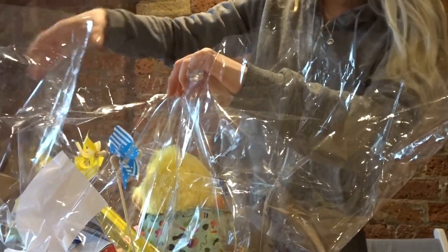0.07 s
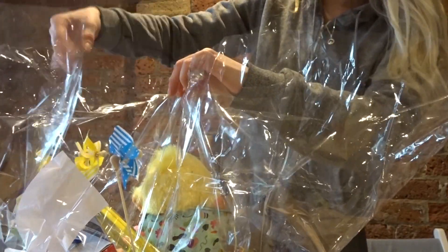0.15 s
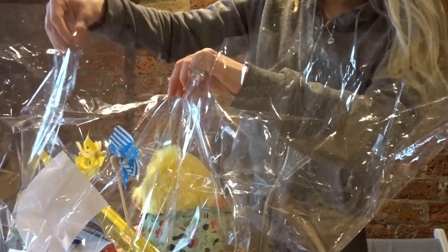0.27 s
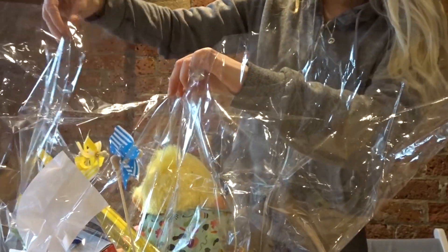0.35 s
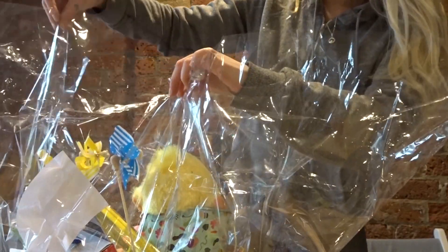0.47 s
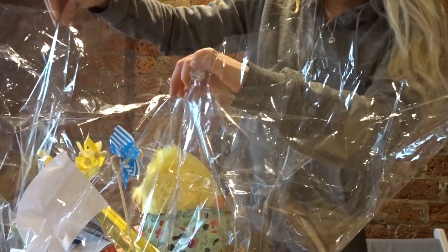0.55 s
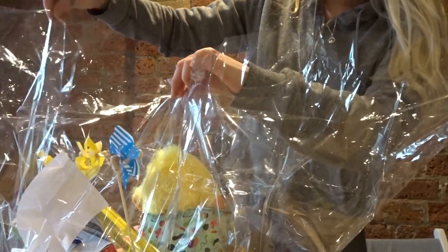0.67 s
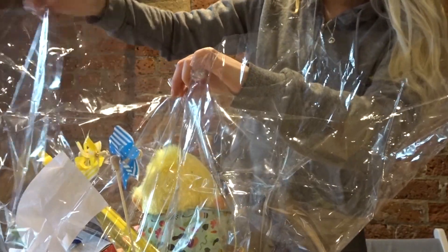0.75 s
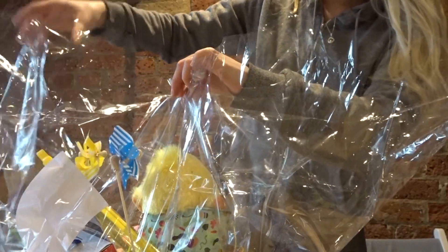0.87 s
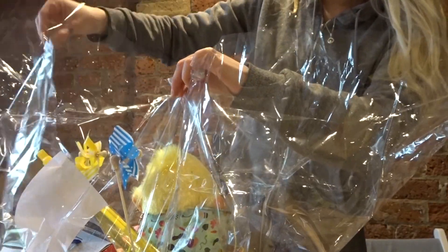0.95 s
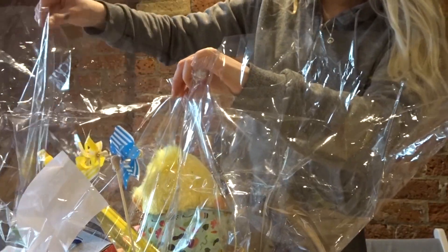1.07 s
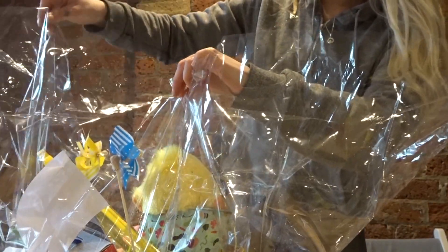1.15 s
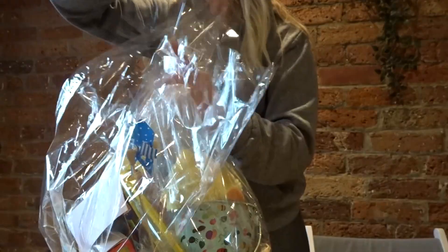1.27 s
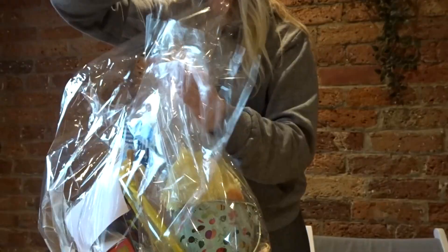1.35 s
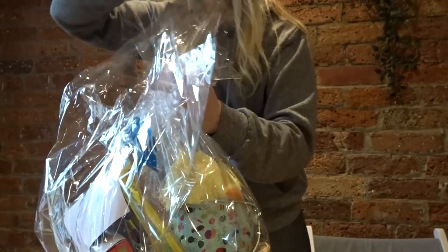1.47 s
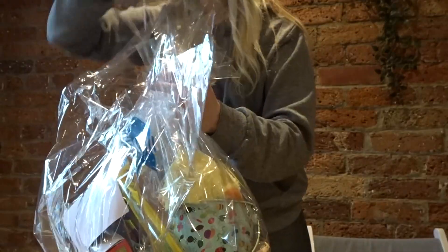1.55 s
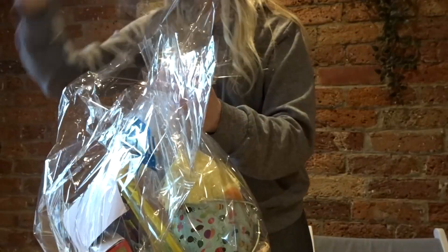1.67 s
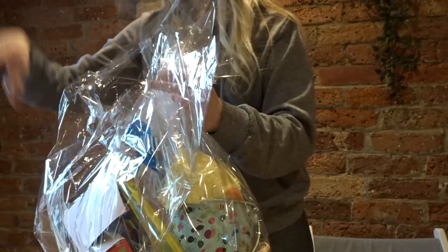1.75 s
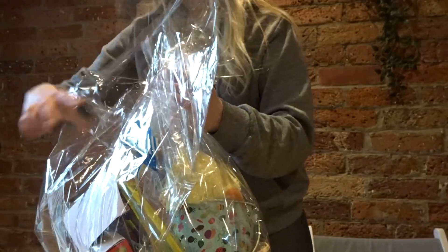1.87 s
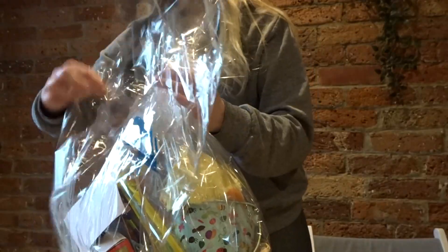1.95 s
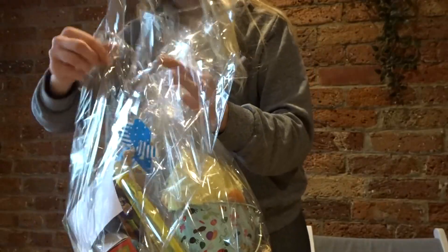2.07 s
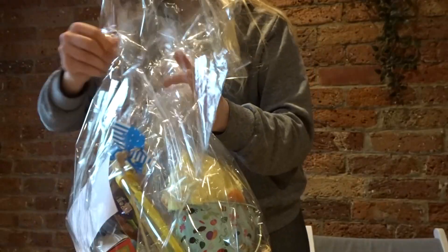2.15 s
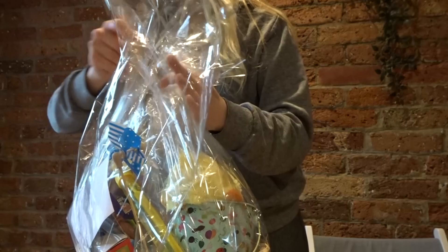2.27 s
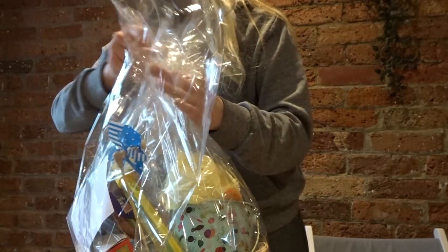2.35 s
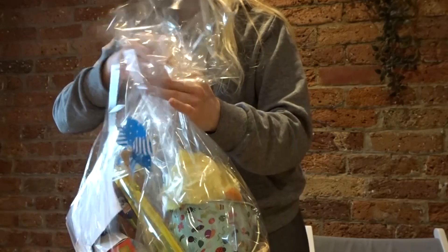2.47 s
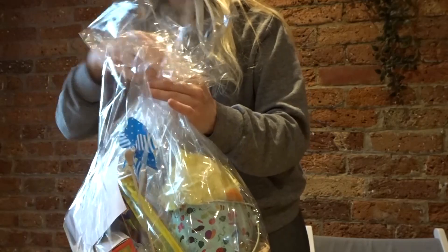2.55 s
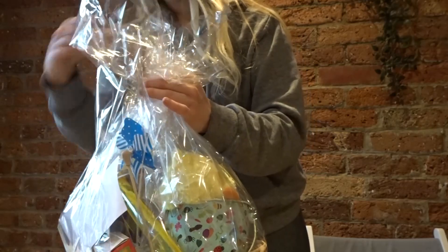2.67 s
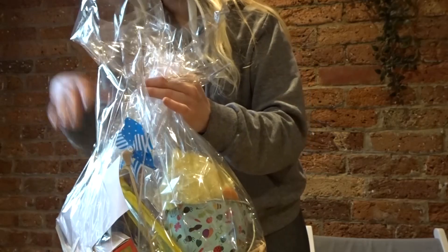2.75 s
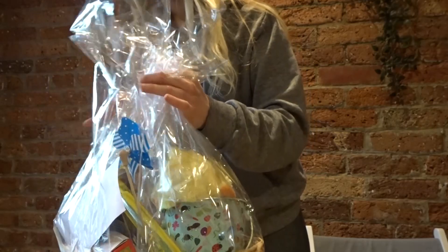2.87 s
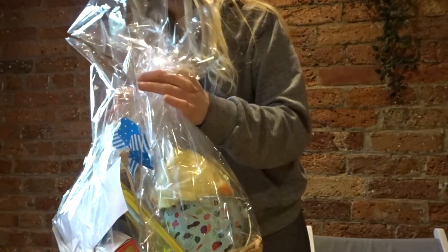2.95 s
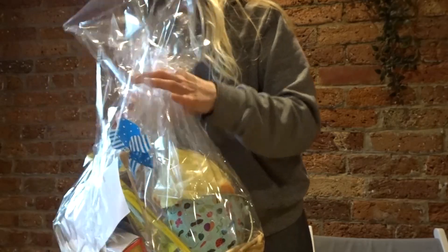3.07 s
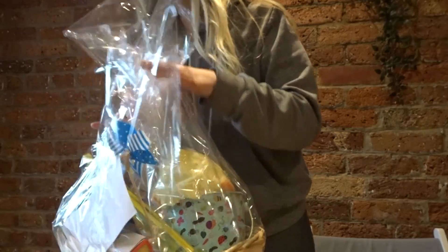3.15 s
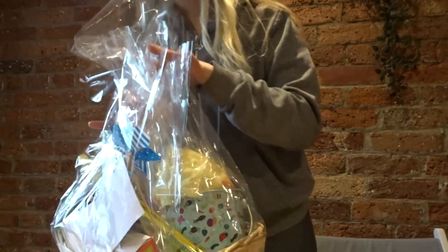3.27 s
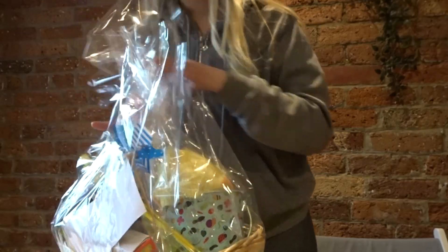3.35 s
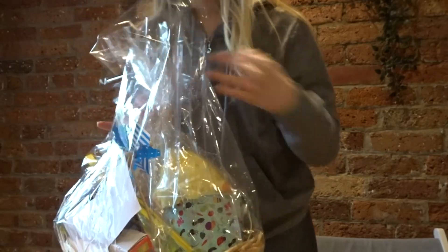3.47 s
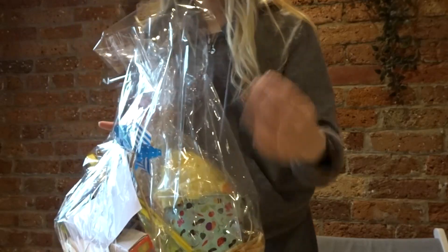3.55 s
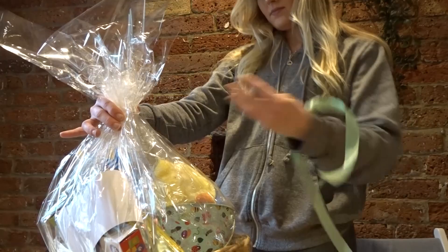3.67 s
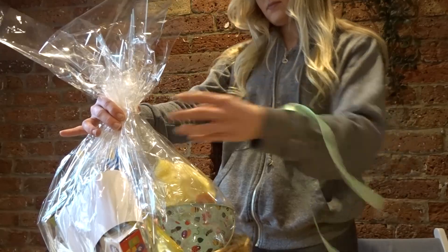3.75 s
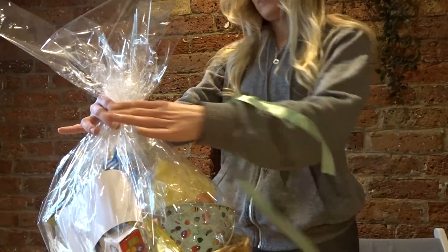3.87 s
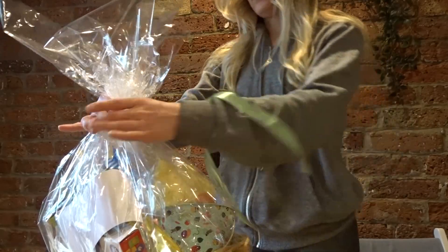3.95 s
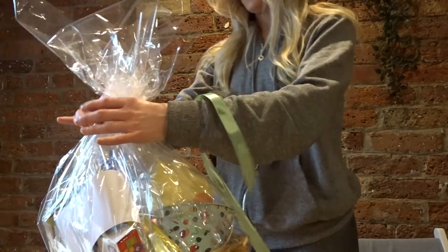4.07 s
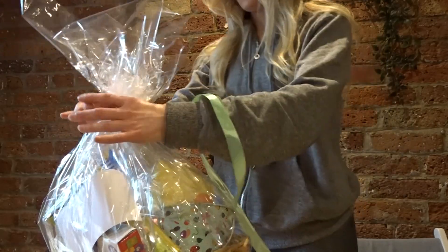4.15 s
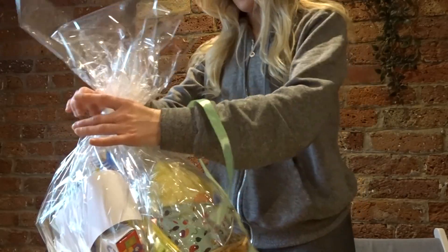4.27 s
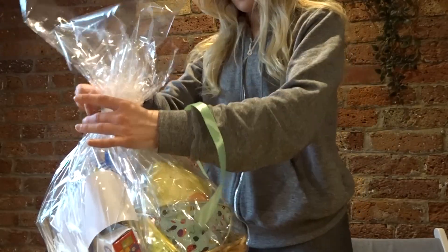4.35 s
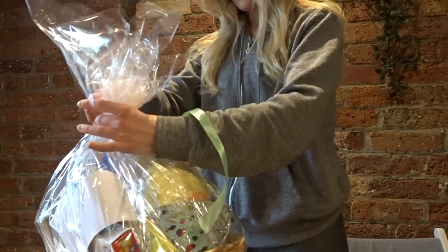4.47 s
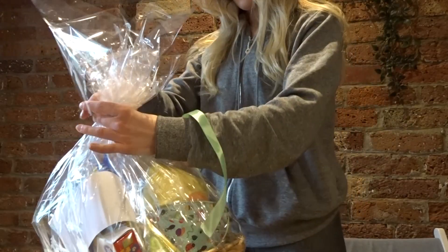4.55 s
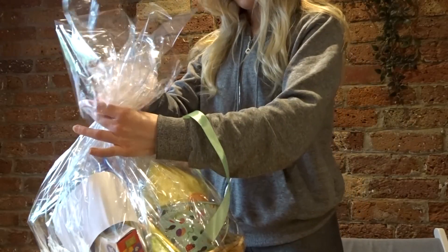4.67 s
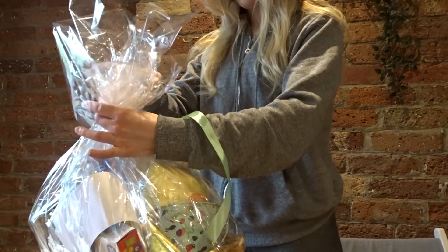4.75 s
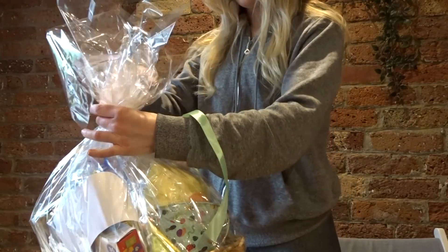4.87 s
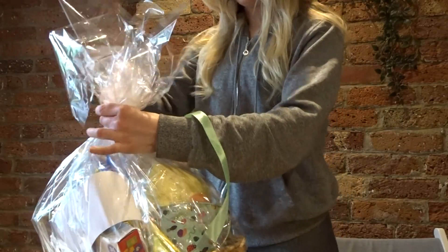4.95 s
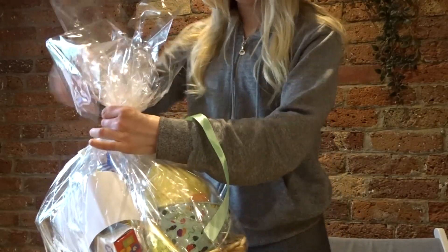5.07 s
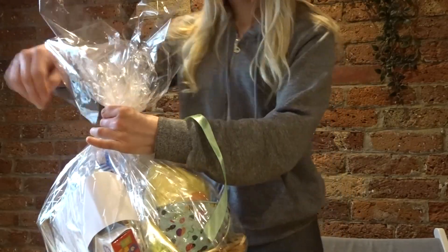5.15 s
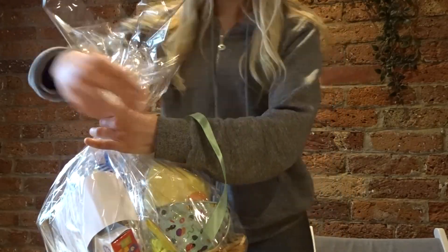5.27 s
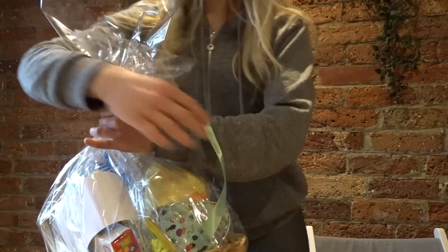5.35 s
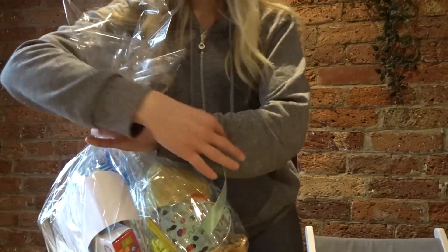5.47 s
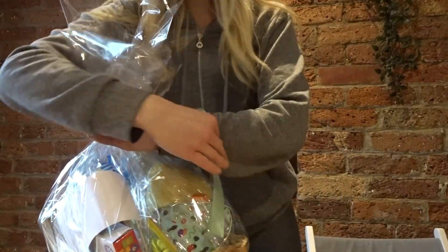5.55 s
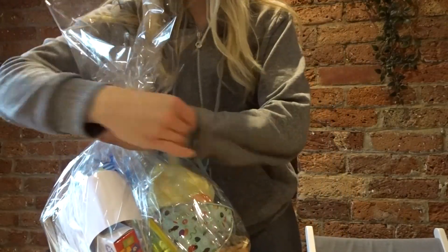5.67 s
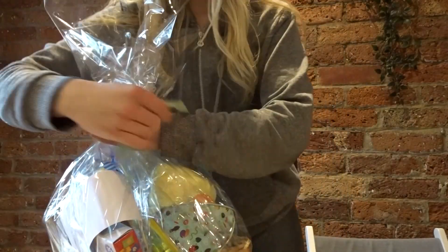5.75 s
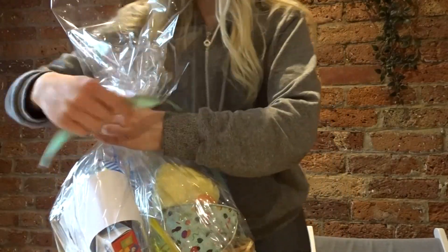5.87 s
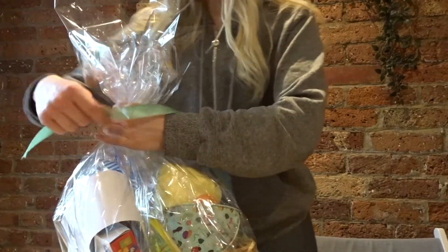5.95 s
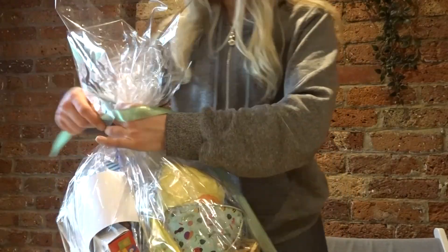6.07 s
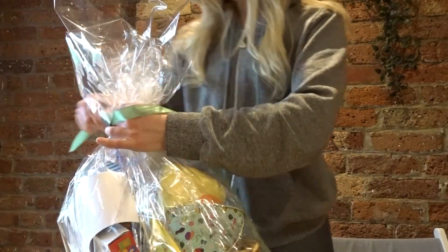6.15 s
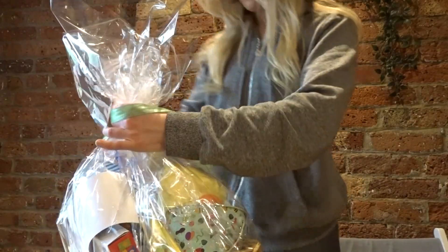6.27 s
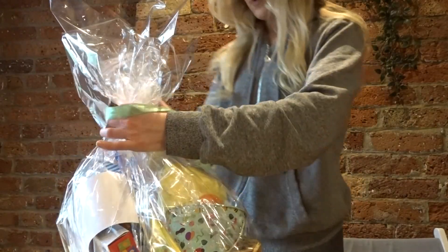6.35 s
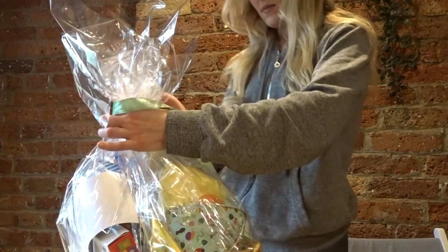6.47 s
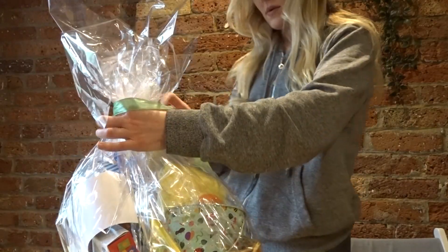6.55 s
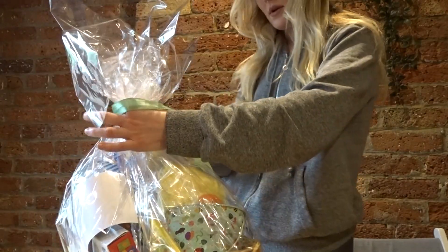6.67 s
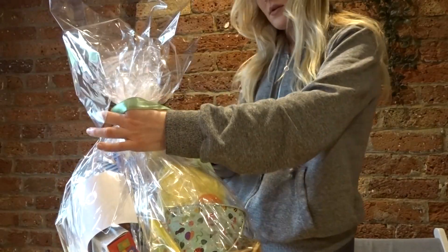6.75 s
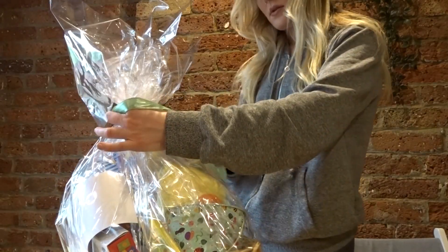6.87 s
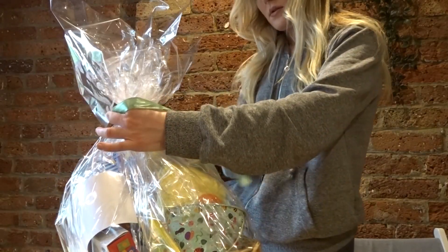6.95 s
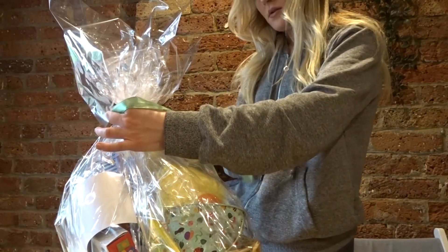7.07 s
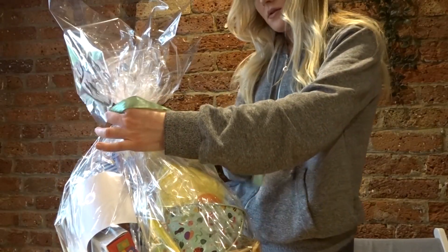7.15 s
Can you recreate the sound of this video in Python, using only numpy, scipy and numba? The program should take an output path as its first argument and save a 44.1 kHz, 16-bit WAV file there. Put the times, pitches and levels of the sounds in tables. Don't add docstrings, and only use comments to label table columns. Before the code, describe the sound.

Stiff clear plastic film crackles in rough tugs, then bunches into loud dense crinkling before easing into sparse, gentle crackles in a brick room.

```python
import sys
import numpy as np
from scipy import signal
from scipy.fft import rfft, irfft, next_fast_len
from scipy.io import wavfile
from scipy.ndimage import map_coordinates
from numba import njit

SR = 44100
rng = np.random.default_rng(int(sys.argv[2]) if len(sys.argv) > 2 else 0)


def dump(signal):
    limited = np.clip(np.atleast_2d(signal).T, -1, 1)
    pcm = np.round(limited * 32767).astype(np.int16)
    wavfile.write(sys.argv[1], SR, pcm)


def how_loud(loudness_db):
    steps = np.asarray(loudness_db, float) / 20
    return 10 ** steps


N = 317927

SPLICES = [1.243, 3.646]
# [start t/s, end t/s, first level/dB, last level/dB]
GRIPS = [(.17, .47, -23, -26), (.91, 1.01, -22.5, -23.5), (1.245, 1.35, -22.5, -17.5),
         (1.36, 1.49, -17, -17), (1.52, 1.585, -22.5, -20.5), (1.73, 1.84, -33.5, -33.5),
         (1.925, 2.03, -22, -15.5), (2.03, 2.3, -14.5, -19), (2.3, 2.52, -18, -14),
         (2.52, 2.73, -14, -17.5), (2.78, 2.88, -26.5, -27), (2.88, 3.03, -24, -14.5),
         (3.03, 3.3, -15, -14), (3.3, 3.45, -13, -19.5), (3.77, 3.85, -46, -40), (3.875, 3.95, -30, -36),
         (3.975, 4.07, -23.5, -19), (4.11, 4.3, -22, -20), (4.3, 4.44, -21.5, -21.5),
         (4.44, 4.66, -20.5, -16.5), (4.66, 4.92, -16.5, -23), (4.92, 5.11, -23, -18.5),
         (5.18, 5.26, -26, -27), (5.275, 5.47, -17, -24), (5.57, 5.8, -27.5, -32), (5.8, 6.0, -31.5, -40.5),
         (6.04, 6.17, -36, -38), (6.21, 6.41, -38.5, -26.5), (6.495, 6.69, -30, -37),
         (7.04, 7.13, -40.5, -33)]
# [t/s, peak level/dB, f/Hz]
FOLD_CRACKS = [(0.0588, -19, 3660), (0.0862, -16, 5060), (0.1745, -10, 4250), (0.2254, -7, 4720),
               (0.2764, -10, 4050), (0.3094, -7, 4090), (0.3381, -6, 4310), (0.3864, -7, 4610),
               (0.4155, -9, 4580), (0.4454, -11, 4610), (0.5097, -7, 3960), (0.5154, -7, 4850),
               (0.5944, -21, 4320), (0.6659, -9, 4090), (0.6814, -16, 4660), (0.7272, -21, 4950),
               (0.7876, -13, 4650), (0.7944, -11, 4740), (0.9053, -10, 3670), (0.9148, -6, 4080),
               (0.9984, -5, 4310), (1.0054, -6, 4130), (1.052, -8, 4740), (1.1574, -12, 4130),
               (1.2044, -16, 4190),
               (1.2446, -4, 4860), (1.2504, -6, 3590), (1.2594, -5, 4440), (1.2894, -4, 6130), (1.3254, -3, 4210),
         (1.5324, -6, 5420), (1.5804, -6, 4280), (1.5964, -6, 6420), (1.6124, -11, 3940),
         (1.6516, -12, 5870), (1.6894, -19, 5030), (1.7145, -20, 4340), (1.73, -3, 4120),
         (1.7524, -11, 4720), (1.7624, -16, 4940), (1.7789, -8, 4080), (1.8198, -20, 5760),
         (1.925, -6, 3220), (2.1924, -2, 3480), (2.2762, -4, 3540), (2.7521, -5, 5780), (2.7926, -9, 3850),
         (2.82, -10, 4020), (2.8524, -12, 3210), (2.9482, -4, 4140), (3.4444, -3, 4590), (3.5024, -4, 3070),
         (3.5754, -9, 4430), (3.5974, -13, 6630), (3.6272, -16, 3790),
               (3.7244, -31, 2980), (3.7623, -26, 3910), (3.7788, -21, 3560), (3.7954, -27, 2940),
           (3.8397, -21, 3310), (3.8671, -17, 6830), (3.8796, -17, 4280), (3.912, -16, 5390),
           (3.9345, -17, 3530), (3.9619, -11, 3610), (3.9764, -3, 3150), (4.0417, -2, 2840),
           (4.1205, -7, 2820), (4.2924, -5, 5380), (4.3694, -7, 3400), (4.4448, -8, 3670),
           (4.5664, -4, 5050), (4.7177, -2, 4260), (4.7644, -5, 3360), (4.8309, -5, 4320),
           (5.0314, -4, 3310), (5.0519, -6, 3380), (5.1104, -4, 3590), (5.1931, -13, 3420),
           (5.2425, -9, 3620), (5.3408, -4, 3700), (5.5099, -11, 3820), (5.5338, -3, 4900),
           (5.5857, -9, 3940), (5.6246, -11, 3650),
               (5.6514, -14, 3420), (5.7244, -14, 3300), (5.7603, -14, 6320), (5.8034, -15, 3370),
       (5.8431, -14, 4950), (5.8661, -18, 5070), (5.8995, -17, 4410), (5.9414, -20, 4300),
       (6.0267, -20, 3760), (6.0444, -17, 3410), (6.094, -18, 3620), (6.117, -4, 3380), (6.1454, -18, 3570),
       (6.2174, -22, 4230), (6.2801, -12, 5300), (6.3235, -14, 5560), (6.3964, -9, 3360),
       (6.4896, -5, 4760), (6.5554, -15, 3460), (6.577, -17, 6920), (6.6333, -20, 3490),
       (6.7351, -19, 4340), (6.7555, -15, 3630), (6.8194, -19, 4920), (6.8369, -14, 6730),
       (6.9017, -16, 3750), (6.9586, -20, 3520), (6.9905, -16, 3400), (7.0364, -21, 3330),
       (7.0678, -16, 3850)]
BIG_FOLDS = FOLD_CRACKS


def unit(x):
    return x / np.sqrt(np.mean(x ** 2) + 1e-20)


def along(points, hz):
    f, v = np.transpose(points)
    return np.interp(np.log(hz + 1), np.log(f + 1), v)


def filtered(x, response):
    m = next_fast_len(x.shape[-1] + 8192)
    spectrum = rfft(x, m) * response(np.fft.rfftfreq(m, 1 / SR))
    return irfft(spectrum, m)[..., :x.shape[-1]]


def noise(curve):
    return filtered(rng.standard_normal((2, N)), lambda hz: how_loud(along(curve, hz)))


def wobble(rate, s):
    knots = rng.standard_normal(400 * N // SR)
    return map_coordinates(knots, np.reshape(s * rate, (1, -1)))[None]


def diffuse(pair):
    # [f/Hz, correlation]
    likeness = [(150, 0.99), (300, 1), (700, 0.94), (2000, 0.85), (4500, 0.15), (8000, 0.25), (15000, 1)]
    turn = lambda hz: np.arccos(np.clip(along(likeness, hz), 0, 1)) / 2
    mid, side = filtered(pair, lambda hz: np.array([np.cos(turn(hz)), np.sin(turn(hz))]))
    return np.array([mid + side, mid - side])


@njit
def rings(n, sr, s, size, hz, life, lag):
    out = np.zeros((2, n))
    for g in range(len(s)):
        for ch in range(2):
            start = s[g] + lag[g] * (0.5 - ch)
            first = int(start * sr) + 1
            for i in range(max(first, 0), min(first + int(5 * life[g] * sr), n)):
                t = i / sr - start
                out[ch, i] += size[g] * np.sin(2 * np.pi * hz[g] * t) * np.exp(-t / life[g])
    return out


def hands(s):
    # [t/s, held/s, level/dB]
    tugs = [(0.0, 0.011, -27.5), (0.049, .02, -34), (.135, .02, -35), (0.504, 0.009, -22.5),
            (0.667, 0.0027, -30), (.785, 0.04, -27.5), (1.054, .04, -19), (1.16, 0.045, -31),
            (3.488, 0.033, -17.5), (3.59, 0.06, -34), (3.65, 0.0083, -42.5), (3.72, .04, -50),
            (5.51, 0.034, -24), (6.024, 0.013, -35.5), (6.74, 0.057, -35.5), (6.825, 0.027, -34.5),
            (6.9, 0.022, -38.5), (6.955, .01, -37), (6.99, 0.012, -37.5), (7.13, .08, -32)]
    hold = [(0.0, -6, -43), (.55, -5, -41.5), (1.05, -6, -38.5), (1.3, -5, -41.5), (1.75, -7.5, -41.5),
            (2.1, -8, -38.5), (2.5, -9.5, -43), (3.0, -10, -41.5), (3.5, -9, -39), (3.8, -6, -41.5),
            (4.3, -7, -40.5), (4.7, -12, -41), (5.4, -6.5, -42), (5.8, -6, -41), (6.12, 0.5, -40),
            (6.4, -8.5, -41), (6.9, -7, -43), (7.21, -9.5, -39)]
    grab_db_per_s, jerk_db_per_s, let_go_db_per_s = 602, 1300, 177
    rest_db, shower_db = -53, 0.7
    fine_grows, flex_grows = 0.17, 0.74

    t = np.arange(0, N / SR, 1e-3)
    moves = GRIPS + [(a, a + held, db, db) for a, held, db in tugs]
    a, b, first, last = np.transpose(moves)[:, :, None]
    is_grip = np.arange(len(moves)) < len(GRIPS)
    rise = np.where(is_grip, grab_db_per_s, jerk_db_per_s)[:, None]
    level = first + (last - first) * np.clip((t - a) / np.maximum(b - a, 1e-3), 0, 1)
    level = level - rise * np.maximum(a - t, 0) - let_go_db_per_s * np.maximum(t - b, 0)
    same_take = np.searchsorted(SPLICES, t) == np.searchsorted(SPLICES, (a + b) / 2)
    strongest = np.where(same_take, level, rest_db).max(0).clip(rest_db)
    effort_db = np.interp(s, t, strongest)

    when, fine_db, flex_db = np.transpose(hold)
    above = effort_db + 25
    fine_db = np.interp(s, when, fine_db) + fine_grows * above
    flex_db = np.interp(s, when, flex_db) + flex_grows * above
    return effort_db + shower_db, fine_db, flex_db


def slips():
    fold_frees, fade_s = 0.43, 0.012
    u = rng.random((210, 2))
    release = np.bincount((u[:, 0] * N).astype(int), -np.log(u[:, 1] + 0.15), N)
    release[(np.transpose(BIG_FOLDS)[0] * SR).astype(int)] += fold_frees
    fade = np.exp(-1 / (fade_s * SR))
    power = 1.2 + signal.lfilter([1.6], [1, -fade], release)
    return 10 * np.log10(power / power.mean())


def creases(uneven_db):
    # [f/Hz, level/dB per Hz]
    film_tone = [(530, -37), (900, 0.5), (2270, 1.5), (4710, 6), (9440, -3.5), (14200, -17.5), (15800, -7)]
    count = 30000
    u, z = rng.random((count, 8)), rng.standard_normal((count, 8))
    s = u[:, :1] * N / SR + 0.000506 * u[:, 1:4]
    hz = 1000 * 16 ** ((np.arange(3) + u[:, 4:7]) / 3)
    effort_db, fine_db, _ = hands(s)

    size = how_loud(along(film_tone, hz)) * hz * np.sign(z[:, :3])
    life = 1.5 / hz * np.exp(0.19 * z[:, 3:6])
    size = size / np.sqrt(np.sum(size ** 2 * life) / 4 * SR / N)

    steep = np.interp(effort_db, [-38, -18], [1.05, 0.55])
    spread = (u[:, 7:] + 0.005) ** -steep * (1 - steep) / (1 - 0.005 ** (1 - steep))
    size = size * np.sqrt(spread)

    tilt_db = (fine_db + 12) * np.clip(np.log2(hz / 5000), 0, 1.3)
    jerk_db = np.interp(s * SR, np.arange(N), uneven_db)
    size = size * how_loud(effort_db + tilt_db + jerk_db - 0.85)
    lag = 1.8e-5 * z[:, 6:7] * np.ones(3)
    return rings(N, SR, s.ravel(), size.ravel(), hz.ravel(), life.ravel(), lag.ravel())


def folds():
    edge_level_db, edge_scatter_db, onset_offset_s = -8, 2.5, 0.0007
    s, db, hz = np.transpose(BIG_FOLDS)[:, :, None]
    u, z = rng.random((len(s), 24)), rng.standard_normal((len(s), 72))
    step = np.arange(24)
    rattle_s = (0.0002 + 0.0016 * u) * (step > 2)
    trail_s = 0.002 + 0.025 * u ** 1.6
    late = np.where(step < 8, rattle_s, trail_s)
    pitch = np.clip(hz * np.exp(0.26 * z[:, :24]), 2200, 14000)
    size_db = db - 6 + 2 * z[:, 24:48] - 20 * (step >= 8)
    size_db = size_db - 250 * late - 4000 * late * (step < 8)
    size = how_loud(size_db) * np.sign(z[:, 48:])

    edge_db = edge_level_db + edge_scatter_db * z[:, 24:25]
    pitch[:, :3] = np.hstack([hz, 1.8 * hz, 9500 + 0 * hz])
    crack_db = db + 1.5 + np.hstack([0 * hz, 0 * hz - 2, edge_db - 1])
    size[:, :3] = how_loud(crack_db) * np.sign(z[:, 48:49])

    start = s + onset_offset_s + late
    lag = 1.5e-5 * z[:, -1:] * np.ones(24)
    return rings(N, SR, start.ravel(), size.ravel(), pitch.ravel(), (0.9 / pitch).ravel(), lag.ravel())


def rubbing(uneven_db):
    # [f/Hz, level/dB per Hz]
    slide_tone = [(410, -30), (700, -2), (2260, -4), (4460, -1.5), (9380, -2), (14200, -3.5), (16000, -28)]
    effort_db, fine_db, _ = hands(np.arange(N) / SR)
    hiss = unit(noise(slide_tone))
    return diffuse(hiss) * how_loud(1.06 * effort_db + 0.5 * (fine_db + 8) + 0.6 * uneven_db - 6)


def panels():
    # [f/Hz, level/dB per Hz]
    panel_tone = [(18, -65), (30, -37), (81, -12), (114, -16), (162, -7), (248, -6.5), (343, -2),
                  (1000, -8.5), (1300, -30), (2200, -120)]
    s = np.arange(N) / SR
    push = unit(noise(panel_tone))
    return diffuse(push) * how_loud(hands(s)[2] + 0.17 + 1.33 * wobble(25, s))


def thuds():
    # [t/s, peak level/dB, f/Hz]
    knocks = [
        (2.239, -36, 32.3),
        (3.025, -22, 95),
        (3.035, -17, 170),
        (4.341, -33, 88.8),
        (5.189, -41, 96),
    ]
    s, db, hz = np.transpose(knocks)
    return rings(N, SR, s, how_loud(db - 6.0), hz, 2.0 / hz, 0 * s)


def walls(x):
    # [f/Hz, t60/s]
    decay_time = [(1000, 0.41), (5000, 0.35), (15000, 0.27)]
    cuts = np.round(np.array(SPLICES + [N / SR]) * SR).astype(int)
    edges = np.union1d(np.arange(0, N, 1024), cuts)
    hz, t, z = signal.stft(rng.standard_normal((16, 2, SR // 4)), SR, nperseg=256)
    decay = how_loud(-60 * t / along(decay_time, hz)[:, None])
    tails = signal.istft(z * decay, SR, nperseg=256)[1]
    tails = tails / np.sqrt(np.mean(np.sum(tails ** 2, -1)))
    out = np.zeros((2, N))
    for block, (a, b) in enumerate(zip(edges, edges[1:])):
        delayed = np.pad(x[a:b], (90, 0))[None]
        answer = signal.fftconvolve(delayed, tails[block % len(tails)], axes=1)
        take_end = cuts[cuts >= b][0]
        part = out[:, a:take_end][:, :answer.shape[1]]
        part += answer[:, :part.shape[1]]
    return diffuse(out)


def room_tone():
    # [f/Hz, level/dB per Hz]
    air_tone = [(18, -48), (30, -26), (394, 0), (1010, 3), (5450, -6), (13300, -34), (16000, -28)]
    return how_loud(-50.5) * unit(diffuse(noise(air_tone)))


def scene():
    effort_db = hands(np.arange(N) / SR)[0]
    uneven_db = slips() * np.interp(effort_db, [-34, -22], [1.4, 1])
    patch = signal.butter(3, 1300, "high", fs=SR, output="sos")
    crackle = signal.sosfilt(patch, creases(uneven_db) + folds())
    echo = how_loud(-9) * walls(crackle.mean(0))
    return crackle + echo + rubbing(uneven_db) + panels() + thuds() + room_tone()


def roll_off(x):
    return signal.sosfilt(signal.butter(12, 16760, fs=SR, output="sos"), x)


def record(dry):
    # [f/Hz, left minus right level/dB]
    left_louder = [(250, 0), (1000, .9), (4000, 2.5), (8000, 2.2), (13000, -.2)]
    # [f/Hz, phase lead/rad]
    left_sooner = [(200, 0), (1000, 0.19), (3270, 0), (5340, 1.0), (12700, 0.92), (16400, .3)]
    ceiling, top_hz = 0.9, 15900
    side = np.array([[0.5], [-0.5]])
    x = filtered(dry, lambda hz: how_loud(along(left_louder, hz) * side) * np.exp(1j * along(left_sooner, hz) * side))
    x = x / (1 + np.abs(x / ceiling) ** 6) ** (1 / 6)
    x = filtered(x, lambda hz: hz < top_hz)
    return roll_off(x)


dry = scene()
out = record(dry)
dump(out)
```